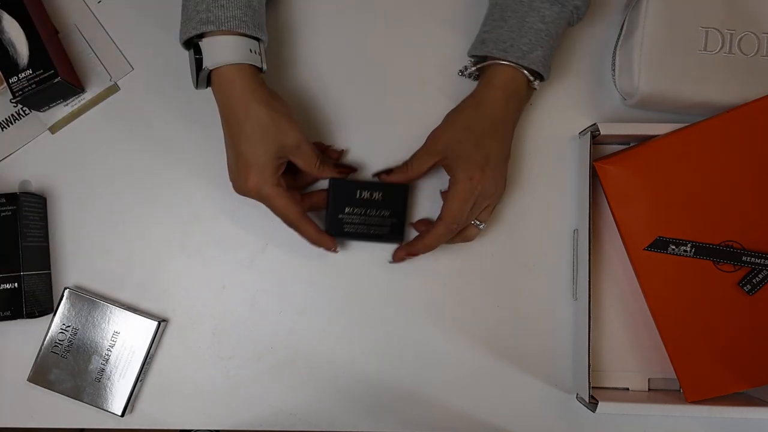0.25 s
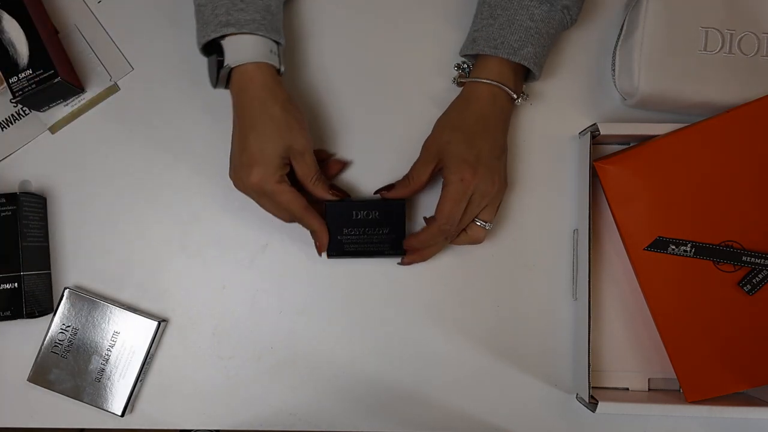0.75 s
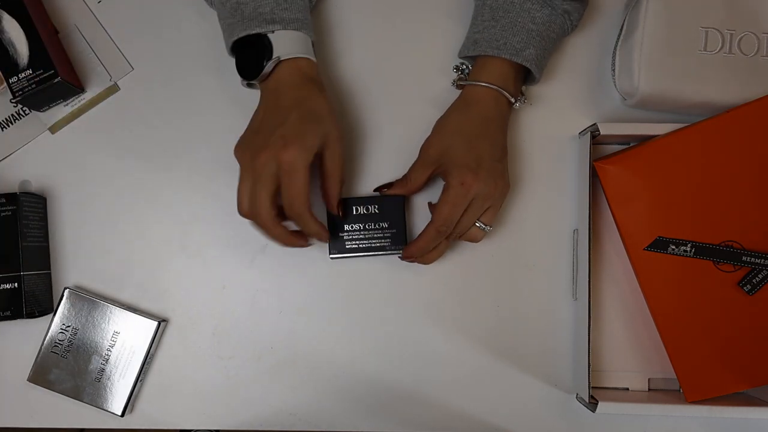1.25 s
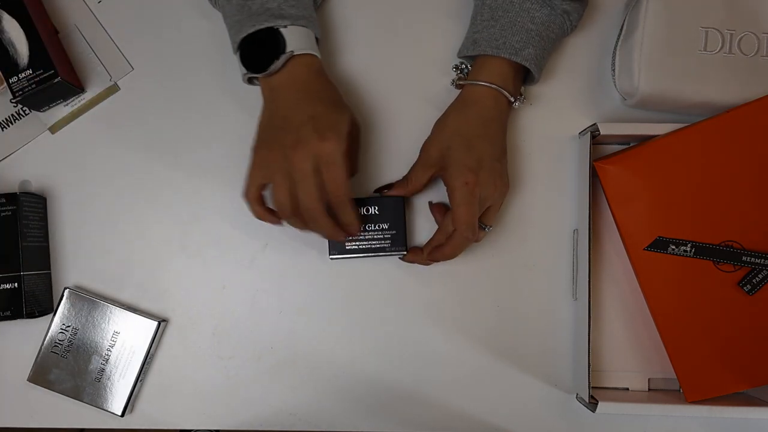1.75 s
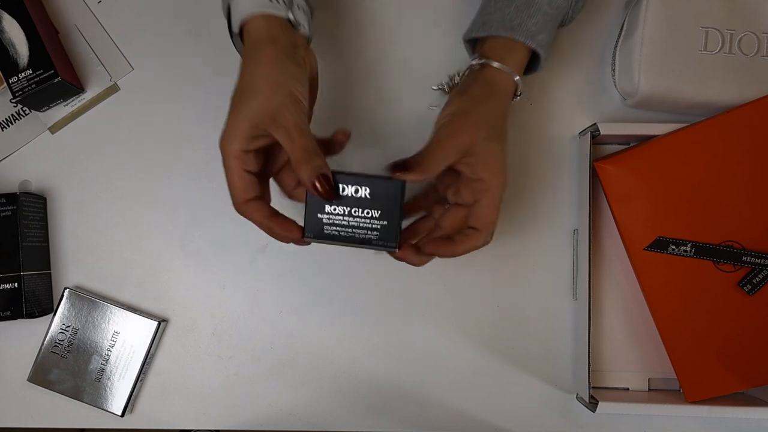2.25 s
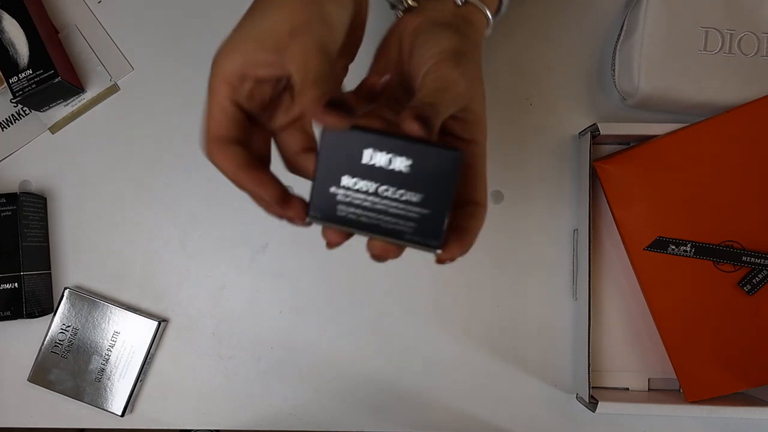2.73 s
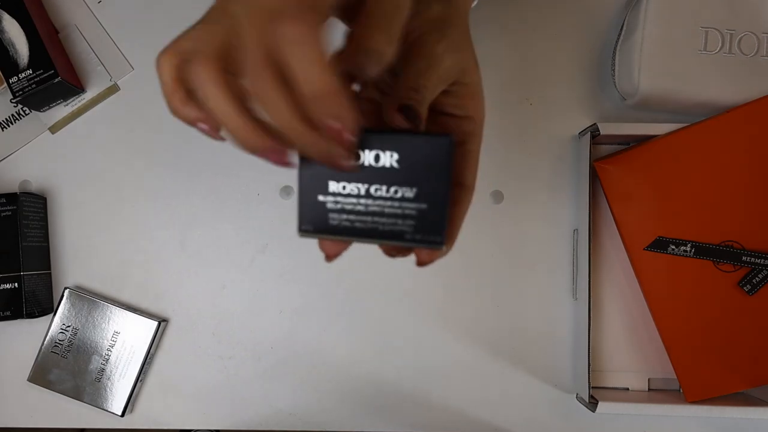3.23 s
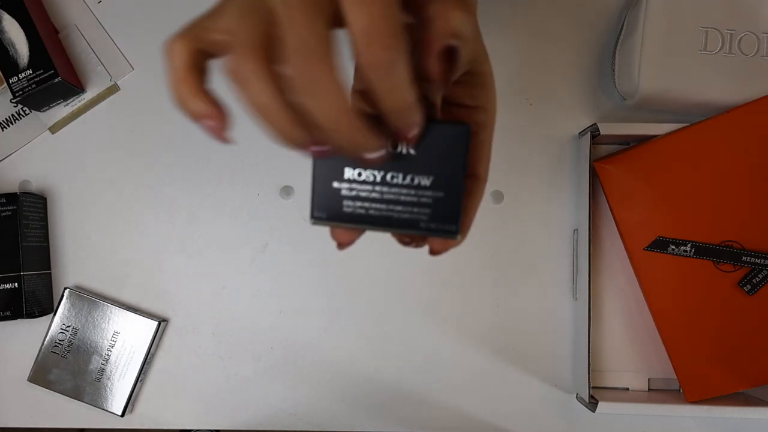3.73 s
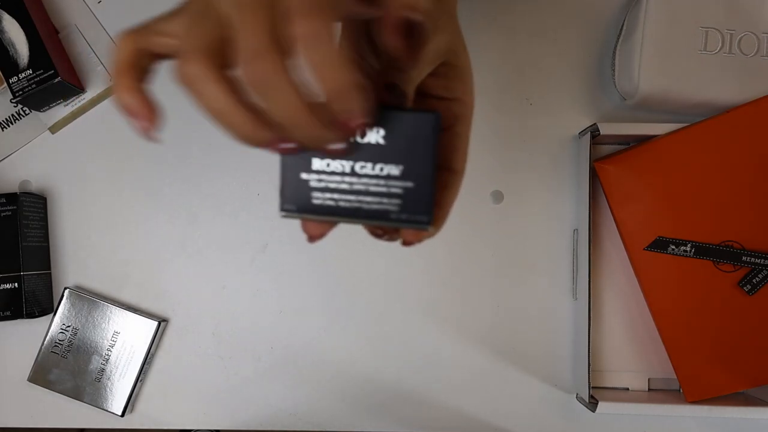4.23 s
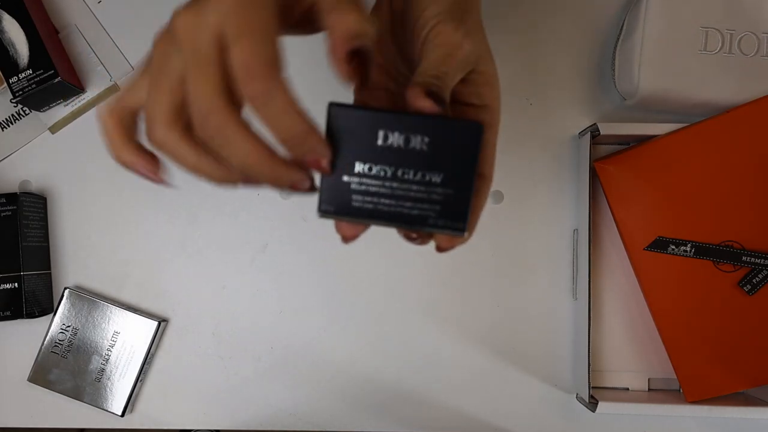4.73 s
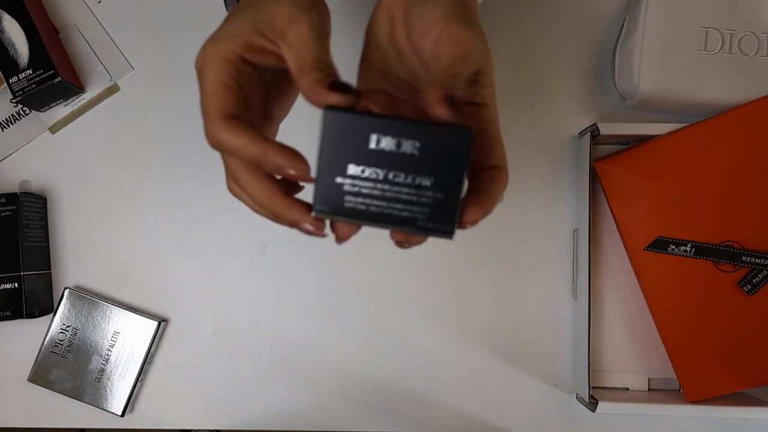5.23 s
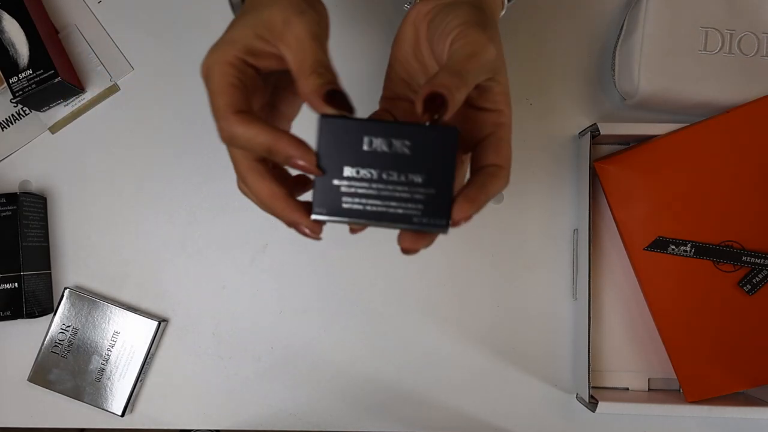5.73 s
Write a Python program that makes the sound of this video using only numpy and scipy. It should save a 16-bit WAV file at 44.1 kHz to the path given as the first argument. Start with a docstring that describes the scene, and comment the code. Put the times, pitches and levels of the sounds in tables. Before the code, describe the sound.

Fingers rub and shift a small stiff carton on a table, then long nails drum a quick cluster of sharp hollow taps with low table thuds. The box is lifted with faint handling and tiny high ticks, and a second, steadier and brighter run of taps follows in the hand. It ends in soft scuffs and light clicks. Close microphone, small quiet room, faint hum.

```python
"""Long nails drum on a small carton, first on a table close to the microphone, then held in the hands.
Each tap is a set of dying sines for the spot struck, the nail, the air inside and the panels.
Fingers rub and shift on the card: clumped random slips excite its broad resonances. The table top
answers with low thuds, and tiny ticks, perhaps a bracelet, ring in the treble. A quiet room with air,
a faint appliance hum and low shakes lies behind; near echoes and a short tail follow the hands."""
import sys
import numpy as np
from scipy import signal
from scipy.fft import rfft, irfft
from scipy.io import wavfile
from scipy.ndimage import uniform_filter1d

SR = 44100
rng = np.random.default_rng(int(sys.argv[2]) if len(sys.argv) > 2 else 0)


def transcribe(signal):
    """Save signal, clipped to [-1, 1], as a 16-bit WAV file at the path in sys.argv[1]."""
    frames = np.atleast_2d(signal).T
    limited = np.clip(frames, -1, 1)
    pcm = np.round(limited * 32767).astype(np.int16)
    wavfile.write(sys.argv[1], SR, pcm)


N = 263718  # length in samples

# Nail taps on the carton. Each row: start in seconds, blow level in dB, pitch of the struck spot in Hz,
# hollowness in dB above the blow, nail hardness in dB above the blow.
NAIL_TAPS = [(0.0914, -40, 2050, 4, -22), (0.3469, -37, 2270, 10.5, -16), (0.3673, -32.5, 2570, -12, -22),
             (0.9658, -35.5, 5040, 5, 6), (1.2436, -18.5, 2680, 5.5, -7), (1.2831, -26, 3280, -2, -5),
             (1.5793, -18.5, 3200, -0.5, -19), (1.5868, -6, 3600, 1.5, -1), (1.6263, -9, 3380, -0.5, -8.5),
             (1.713, -2, 3030, -5, -8), (1.8009, -9, 2980, -1.5, -4.5), (1.8571, -13.5, 3030, -5.5, -12),
             (1.9704, -27.5, 3320, -4, -24), (1.9974, -18.5, 3780, -7, 4), (2.0074, -25, 3220, -4, -20),
             (2.045, -18.5, 2340, -13, -1), (2.104, -22.5, 2030, -7, -25), (2.4285, -24.5, 2380, 1.5, -2),
             (2.48, -40.5, 5030, -19, 13), (2.6437, -29, 3140, 1, -7), (2.772, -35, 2900, -0.5, -12),
             (2.881, -28.5, 3770, -19, -6), (2.9112, -43, 2400, 8.5, -15), (2.989, -43, 2640, -11, -18),
             (3.262, -34, 2780, 2, -23), (3.3494, -27.5, 4900, 7.5, -0.5), (3.3734, -30, 4100, -4, -20),
             (3.5462, -7.5, 4240, -0.5, -3.5), (3.574, -14, 2240, 1.5, -11), (3.6466, -37, 2200, 3, 4),
             (3.727, -9, 4300, 2, -2), (3.7395, -9.5, 5500, 2, -9), (3.809, -8, 4180, -3, -9),
             (3.905, -15, 4630, 5.5, -1.5), (3.9172, -9, 4340, -3, -15), (4.0049, -7.5, 4010, -2, -8),
             (4.1915, -11, 3510, -0.5, -2.5), (4.2842, -5, 4360, -6.5, -10), (4.375, -10.5, 2800, -2.5, -2),
             (4.454, -12.5, 4030, -2.5, -4), (4.4651, -20, 2440, 1, -30), (4.5858, -14.5, 4100, -2, -10),
             (4.8485, -31, 4280, -3, 2), (5.0034, -33, 2580, -2, -1), (5.0215, -36, 4000, -4, -12),
             (5.058, -24.5, 4260, -7.5, -11), (5.099, -34, 4080, -21, 2), (5.294, -37.5, 3950, -3, 3),
             (5.3311, -20, 840, 6.5, -12), (5.48, -41, 2760, -17, -12), (5.5135, -43.5, 3500, -13, -8),
             (5.676, -22.5, 2170, -37, -6), (5.6796, -21, 2970, -34, -4.5), (5.6878, -21, 2770, -11, -16),
             (5.6947, -23, 2900, -14, -17), (5.7854, -18.5, 3570, 2, -8)]
# What each part of a tap rings with: nail click, air inside, panels, hard tip of the nail.
# Each row: central pitch in Hz, relative level in dB before the scatter from blow to blow, t60 in seconds.
NAIL_CLICK_MODES = [(4430, -45, 0.034), (4625, 22, 0.0062), (5090, 8.5, 0.022), (5670, 5.5, 0.015),
                    (6230, 9, 0.0071)]
INNER_AIR_MODES = [(300, -12.5, 0.038), (842, -5, 0.042), (1313, 19.5, 0.0073), (1635, 1.5, 0.016)]
PANEL_MODES = [(1868, 6.4, 0.048), (2537, 22.5, 0.016), (3260, 10, 0.042), (3325, 19, 0.016)]
NAIL_TIP_MODES = [(7300, 0, .002), (8600, 0, .002), (10300, -6, .002), (12200, -7, .002), (14500, -6, .002)]
SPOT_DB, NAIL_DB, PANEL_DB = -3.5, -1, -3  # relative to the blow
LIFTED_S = 2.3  # the carton leaves the table
HELD_PANEL_DB = -1.5  # the holding hand damps the panels

# Strokes of skin on card. Each row: start, rise, hold and fall in seconds, rasp level in dB,
# dull drag and fine hiss in dB above the rasp, pitch where the scrape gathers in Hz.
STROKES_ON_CARD = [(0, 0.00033, 0.003, 0.07, -38.5, 3, -20, 2000),
                   (0.022, .07, 0.12, 0.081, -41.5, 6.5, -19.5, 1870),
                   (0.322, 0.033, 0.046, 0.047, -53.5, 8.5, -16, 2280),
                   (0.432, 0.038, 0.043, 0.11, -31, 2.5, -14.5, 1990),
                   (.64, .05, 0.034, .03, -57.5, -1, -3, 3800),
                   (.74, 0.025, 0.018, 0.13, -55.5, 4.5, -4, 3600),
                   (0.892, 0.066, 0.027, 0.13, -46, 3.5, -5.5, 2210),
                   (1.048, 0.05, .01, 0.18, -48, 0, -7.5, 2170),
                   (1.188, 0.07, 0.0042, 0.024, -44.5, 0, -18, 3030),
                   (1.312, 0.052, .005, 0.045, -45.5, 7.5, -27, 2220),
                   (1.598, 0.052, .005, 0.061, -34, -4, -16, 3320),
                   (1.709, 0.034, 0.075, 0.15, -38.5, -0.8, -12, 3160),
                   (1.942, 0.053, 0.14, 0.072, -39.5, 1.5, -23, 3110),
                   (2.072, 0.082, 0.045, 0.13, -30, 1, -13, 3100),
                   (2.21, .035, .02, 0.041, -51, -24, 7, 3100),
                   (2.382, 0.12, 0.011, 0.056, -57, 3, -15, 2460),
                   (2.735, 0.0075, 0.0065, 0.018, -52.5, 1, -6, 2680),
                   (2.79, 0.01, .03, 0.042, -57, 1, -7, 3940),
                   (2.98, .015, .02, 0.12, -67.5, 5.5, -6, 2800),
                   (3.09, 0.023, 0.011, 0.032, -61.5, 2, -4, 4300),
                   (3.312, 0.047, 0.0062, 0.017, -48, -23, -17, 4500),
                   (4.512, 0.061, 0.086, 0.12, -36.5, -1, -9.5, 4650),
                   (4.6, 0.072, 0.06, 0.09, -42.5, -10, -8.5, 4400),
                   (5.282, 0.017, 0.026, 0.048, -53.5, -2, -4, 4120),
                   (5.323, .01, 0.0093, 0.047, -40, -1, -17, 1270),
                   (5.428, 0.063, .005, 0.021, -54, 5, -17, 2880),
                   (5.622, 0.062, .01, 0.04, -56.5, 5, -18, 2900),
                   (5.782, 0.065, .005, 0.076, -46.5, -4.5, -37, 3700)]
SWELL_DB = 25  # climbed in the rise time, lost in each fall time
# Fingers resting and shifting on the card. Each row: time in seconds, rasp level in dB.
FINGER_GRIP = [(0, -57), (.6, -53.5), (.85, -58), (1.3, -61.5), (2.3, -61.5), (2.7, -63), (3.2, -72),
               (4.6, -74), (4.85, -55), (5.07, -61), (5.17, -61.5), (5.98, -66)]
GRIP_DRAG_DB, GRIP_HISS_DB = -0.8, -8  # above the rasp
# Resonances of rubbed card: rough, dull and fine. Each row: pitch in Hz before the table or the
# hands shift it, width in Hz of the first of two filter passes, relative level in dB.
RASP_BANDS = [(2680, 470, 1), (3390, 600, -4), (4070, 485, 0.5), (5200, 1080, -7)]
DRAG_BANDS = [(749, 423, 3.5), (1125, 193, 5), (1451, 380, 7.5), (2230, 350, 2)]
HISS_BANDS = [(7400, 2400, 0), (9000, 2600, -2), (11500, 3500, -6), (13500, 3500, -7), (15500, 3000, -9)]
FOCUS_DB, FOCUS_WIDTH = -3, 0.11  # gathered scrape: dB above the rasp, width of each pass per pitch

# Answers of the table top. Each row: start in seconds, level in dB.
TABLE_THUDS = [(0.385, -39), (0.461, -33), (1.2431, -15.5), (1.585, -24), (1.712, -33), (1.802, -33.5),
               (1.994, -26)]
# Low wooden modes of the table. Each row: central pitch in Hz, relative level in dB, both before a slight
# scatter, t60 in seconds.
TABLE_MODES = [(198.5, -5.5, 0.19), (263, 0, 0.074), (333, -2, 0.065), (433.4, -10.5, 0.1)]
# Tiny high ticks, perhaps a bracelet. Each row: start in seconds, level in dB, pitch in Hz.
BRACELET_TICKS = [(2.2538, -23, 15300), (2.2634, -24, 9150), (2.4788, -16.5, 12300)]

# Echoes off the table top and near things. Each row: delay in seconds, level in dB against the direct sound.
NEAR_ECHOES = [(.0043, -33.5), (.0075, -20.5), (0.012, -29), (.019, -32.5)]
# Dying away of the room. Each row: frequency in Hz, t60 in seconds.
ROOM_DECAY = [(250, 0.42), (700, 0.36), (1700, 0.26), (4500, 0.3), (9000, 0.21), (15000, 0.27)]
# Colour of room air and preamp hiss. Each row: frequency in Hz, relative density in dB per Hz.
AIR_SPECTRUM = [(12, -46), (20, -10.5), (65, -33), (91, -6), (142, -9), (277, -3), (319, -30), (347, -6.5),
                (410, -9), (446, -8), (642, -12), (698, -6.5), (873, -15.5), (12400, -28.5), (16000, -26)]
AIR_DB = -53.5
# Appliance hum. Each row: pitch in Hz, width in Hz, level in dB.
HUM_LINES = [(61, 13.4, -58.5), (334, 6.3, -63), (463, 5.2, -67), (696, 5.1, -61.5)]
# Handling shakes the table under the microphone. Each row: time in seconds, level in dB.
TABLE_SHAKE = [(0.0, -49), (0.43, -53), (0.6, -45), (1.55, -52.5), (1.8, -40.5), (2.2, -53.5), (2.7, -55.5),
               (5.98, -50.5)]
EDGE_HZ = 15800  # upper band limit


def gain_of(db):
    """Turns decibels into an amplitude factor."""
    return 10 ** (np.asarray(db) / 20)


def evened(x):
    """Brings a signal to an RMS of 1."""
    return x / np.sqrt(np.mean(x ** 2) + 1e-20)


def read(points, hz):
    """Reads a curve between its points along a log frequency axis."""
    f, value = np.transpose(points)
    return np.interp(np.log(hz + 1), np.log(f + 1), value)


def over_time(points):
    """Reads a curve between its points at every sample of the scene."""
    return np.interp(np.arange(N) / SR, *np.transpose(points))


def add(mix, s, sound):
    """Lays a sound into the mix from s seconds on, cut at the end."""
    part = mix[round(s * SR):][:len(sound)]
    part += sound[:len(part)]


def resonate(x, hz, width):
    """Shifts hz down to zero, smooths, and shifts back: a resonance of gain 1."""
    turn = np.exp(2j * np.pi * np.cumsum(hz * np.ones(len(x))) / SR)
    pole = np.exp(-np.pi * abs(width) / SR)
    smooth = signal.lfilter([1 - pole], [1, -pole], x / turn)
    return 2 * (turn * smooth).real


def resonate_twice(x, hz, width, widening=1):
    """Two resonances in a row, for steeper skirts; the second is wider by the given factor."""
    return resonate(resonate(x, hz, width), hz, widening * width)


def ring(modes, chance, rise_s):
    """Dying sines of peak 1; chance shifts and reweights the modes from blow to blow."""
    hz, db, t60 = np.transpose(modes)[:, :, None]
    t = np.arange(SR // 4) / SR
    shift, weight = chance[:, :len(modes), None]
    hz = hz * (1 + .055 * shift)
    db = db + 3.5 * weight
    lines = gain_of(db - 60 * t / t60) * np.sin(2 * np.pi * hz * t)
    sound = lines.sum(0) * (1 - np.exp(-t / rise_s))
    return sound / abs(sound).max()


def taps():
    """Each blow sounds the spot struck, the nail, the air inside the carton and its panels."""
    out = np.zeros(N)
    chances = rng.standard_normal((len(NAIL_TAPS), 4, 2, 5))
    for (s, blow_db, spot_hz, hollow_db, hard_db), c in zip(NAIL_TAPS, chances):
        panel_db = PANEL_DB + HELD_PANEL_DB * (s > LIFTED_S)
        spot = [(spot_hz, 0, .008)]
        add(out, s, gain_of(blow_db + SPOT_DB) * ring(spot, np.zeros((2, 1)), 0.00036))
        add(out, s, gain_of(blow_db + NAIL_DB) * ring(NAIL_CLICK_MODES, c[0], .0001))
        add(out, s, gain_of(blow_db + hollow_db) * ring(INNER_AIR_MODES, c[1], 0.00022))
        add(out, s, gain_of(blow_db + panel_db) * ring(PANEL_MODES, c[2], .0001))
        add(out, s, gain_of(blow_db + hard_db) * ring(NAIL_TIP_MODES, c[3], .00004))
    return out


def rub():
    """Dense slips of uneven size, arriving in clumps, excite the card's broad resonances."""
    clumps = evened(uniform_filter1d(uniform_filter1d(rng.standard_normal(N), 120), 120))
    size = gain_of(2.66 * np.minimum(rng.exponential(1, N), 4) + 2.0 * clumps)
    direction = rng.choice([-1, 1], N)
    happens = rng.random(N) < 6000 / SR  # about 6000 slips a second
    slips = size * direction * happens
    on_table = np.arange(N) < LIFTED_S * SR
    pitch_shift = np.where(on_table, .96, 1.04)  # off the table the card sounds a little higher
    levels, drag = pressure()
    out = np.zeros(N)
    for bands, level in zip((RASP_BANDS, DRAG_BANDS, HISS_BANDS), levels):
        body = np.zeros(N)
        for k, (hz, width, db) in enumerate(bands):
            sign = (-1) ** k  # neighbouring bands in opposite phase
            body += sign * gain_of(db) * resonate_twice(slips, hz * pitch_shift, width, 1.98)
        out += level * evened(body)
    # until the lift, the table top rumbles with the drag
    table_top = evened(resonate_twice(slips, 315, 330)) * on_table
    return out + scrape(slips) + gain_of(-15.5) * drag * table_top


def pressure():
    """Levels of rasp, drag and hiss: grip, strokes, and a short skid of the nail after each tap."""
    part_offsets_db = np.array([[0], [GRIP_DRAG_DB], [GRIP_HISS_DB]])
    levels = gain_of(over_time(FINGER_GRIP) + part_offsets_db)
    for start, rise, hold, fall, db, drag_db, hiss_db, _ in STROKES_ON_CARD:
        for level, part_db in zip(levels, (0, drag_db, hiss_db)):
            add(level, start, gain_of(db + part_db) * swell(rise, hold, fall))
    drag_without_skids = levels[1].copy()
    t = np.arange(SR // 5) / SR
    skid = gain_of(-60 * t / 0.16) * (1 - np.exp(-t / 0.00033))
    for s, blow_db, _, hollow_db, hard_db in NAIL_TAPS:
        for level, part_db in zip(levels, (-29, hollow_db - 27, hard_db - 27)):
            add(level, s, gain_of(blow_db + part_db) * skid)
    return levels, drag_without_skids


def scrape(slips):
    """Within each stroke the slips gather on one patch of card with its own pitch."""
    out = np.zeros(N)
    for start, rise, hold, fall, db, _, _, hz in STROKES_ON_CARD:
        shape = swell(rise, hold, fall)
        part = slips[round(start * SR):][:len(shape)]
        patch = resonate_twice(part, hz, FOCUS_WIDTH * hz)
        add(out, start, gain_of(db + FOCUS_DB) * shape[:len(part)] * evened(patch))
    return out


def swell(rise, hold, fall):
    """A stroke climbs, holds and dies away over two fall times, straight in dB."""
    rise, hold, fall = np.abs([rise, hold, fall])
    t = np.arange(0, rise + hold + 2 * fall, 1 / SR)
    climb_left = 1 - t / rise
    fallen = (t - rise - hold) / fall
    return gain_of(-SWELL_DB * np.maximum(0, np.maximum(climb_left, fallen)))


def table():
    """The table top answers in low wooden modes, ringing longer than the card."""
    out = np.zeros(N)
    chances = rng.standard_normal((len(TABLE_THUDS), 2, 5))
    for (s, db), c in zip(TABLE_THUDS, chances):
        add(out, s, gain_of(db) * ring(TABLE_MODES, 0.038 * c, 0.0018))  # almost the same each time
    return out


def bracelet():
    """Tiny hard ticks high in the treble, each a single sine dying within milliseconds."""
    out = np.zeros(N)
    for s, db, hz in BRACELET_TICKS:
        add(out, s, gain_of(db) * ring([(hz, 0, .0013)], np.zeros((2, 1)), .0001))
    return out


def room(x, tail_db):
    """A few near echoes, and sparse reflections of random sign, each band dying at its own speed."""
    sparse = np.zeros((3, SR // 2))
    slots = np.arange(260, SR // 2 - 20, 20)  # one reflection in every 20 samples
    at = slots + rng.integers(0, 20, (3, len(slots)))
    np.put_along_axis(sparse, at, rng.choice([-1., 1.], at.shape), 1)
    hz, t, z = signal.stft(sparse, SR, nperseg=256)
    decay = gain_of(-60 * t / read(ROOM_DECAY, hz)[:, None])
    tails = signal.istft(z * decay, SR, nperseg=256)[1]
    tails = tails / np.linalg.norm(tails[0])
    # the hands keep moving, so the sound path turns among three tails, 3.1 times a second
    turn = 2 * np.pi * (3.1 * np.arange(N) / SR + np.arange(3)[:, None] / 3)
    sends = x * np.sqrt(2 / 3) * np.cos(turn)
    wet = signal.fftconvolve(sends, tails, axes=1)
    out = x + gain_of(tail_db) * wet.sum(0)[:N]
    for s, db in NEAR_ECHOES:
        add(out, s, gain_of(db) * x)
    return out


def background():
    """Steady coloured noise for air and preamp, narrow noise for a wavering hum, low table shakes."""
    hz = np.fft.rfftfreq(N, 1 / SR)
    air = irfft(rfft(rng.standard_normal(N)) * gain_of(read(AIR_SPECTRUM, hz)), N)
    hum = np.zeros(N)
    for line_hz, width, db in HUM_LINES:
        hum += gain_of(db) * evened(resonate(rng.standard_normal(N), line_hz, width))
    shake = evened(resonate_twice(rng.standard_normal(N), 20.5, 44))
    return gain_of(AIR_DB) * evened(air) + hum + gain_of(over_time(TABLE_SHAKE)) * shake


def scene():
    """Everything near the microphone sounds in the room; the background lies under it."""
    near = taps() + table() + bracelet() + rub()
    return (room(near, tail_db=-11) + background())[None]


def record(dry):
    """The converter clips at full scale; then the band limit."""
    clipped = np.clip(dry, -1, 1)
    low_pass = signal.firwin(511, EDGE_HZ, window=("kaiser", 9), fs=SR)
    return signal.oaconvolve(clipped, low_pass[None], "same")


dry = scene()
out = record(dry)
transcribe(out)
```